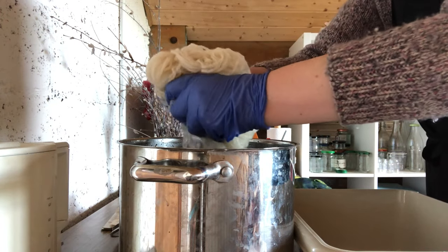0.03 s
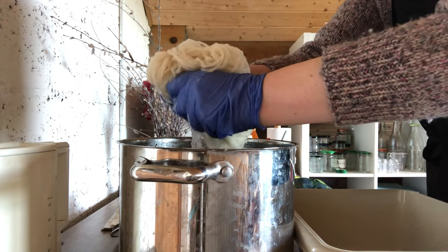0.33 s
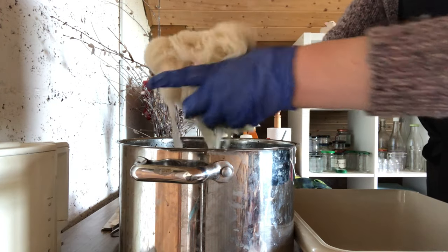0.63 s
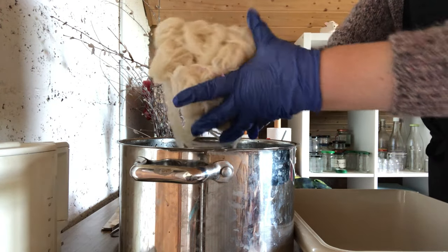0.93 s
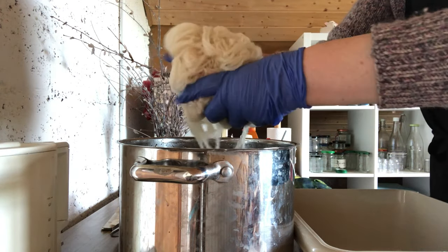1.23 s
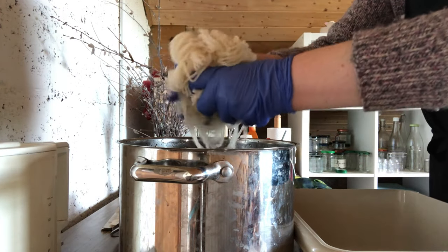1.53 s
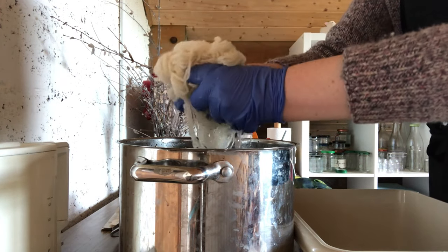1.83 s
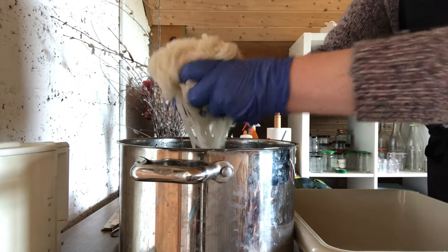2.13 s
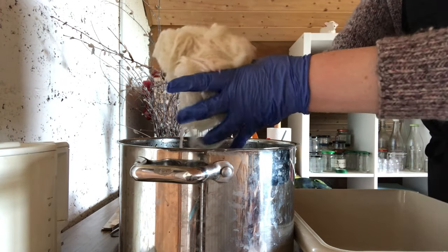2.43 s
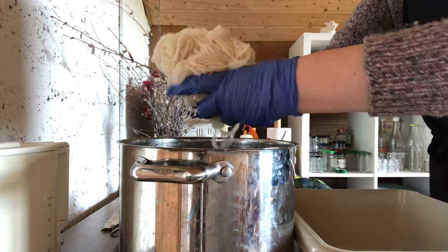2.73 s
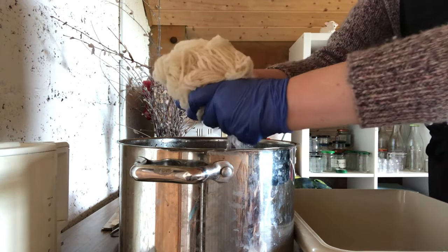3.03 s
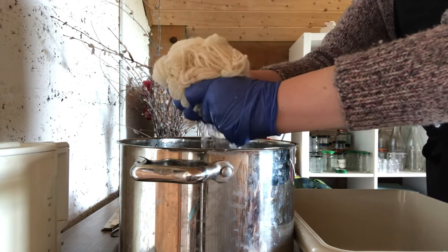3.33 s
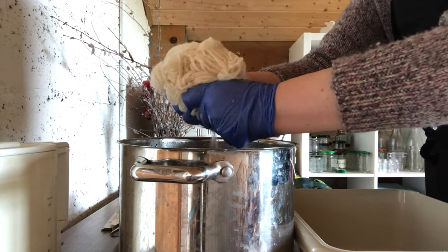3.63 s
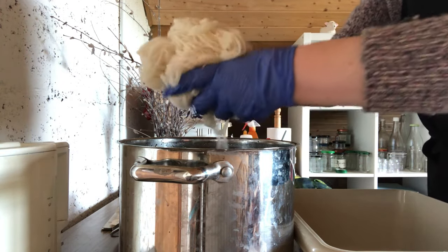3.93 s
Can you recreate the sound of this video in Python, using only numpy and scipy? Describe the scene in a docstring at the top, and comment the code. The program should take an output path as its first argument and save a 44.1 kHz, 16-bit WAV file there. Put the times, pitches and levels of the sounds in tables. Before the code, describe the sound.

Close up in a quiet room, water squeezed from wet wool gushes briefly into a metal pot, then trickles and plinks in two more spurts. Rubber gloves rub and crackle softly over a faint hum.

```python
"""Gloved hands wring wet wool over a steel pot of water, in a quiet room with a faint hum.
The first squeeze fizzes and sends down a gurgling gush; drops tick on the water and trap bubbles
that ring, and the air in the pot rings along. The gloves rub as they shift their grip, and a loud
drop lands at 1.4 s. A second squeeze fizzes and trickles near 2 s, then the gloves rub again.
From 3 s a last squeeze drips, spits and crackles, and fades away by 4 s."""
import sys
import numpy as np
from scipy import signal
from scipy.fft import rfft, irfft
from scipy.io import wavfile

SR = 44100
rng = np.random.default_rng(int(sys.argv[2]) if len(sys.argv) > 2 else 0)


def bounce(signal):
    """Save signal as a 16-bit WAV file at the path given by the first command-line argument."""
    frames = np.transpose(np.atleast_2d(signal))
    limited = np.clip(frames, -1, 1)
    pcm = np.round(limited * 32767).astype(np.int16)
    wavfile.write(sys.argv[1], SR, pcm)


N = 176400
TIME = np.arange(N) / SR


def from_db(db):
    """Turn decibels into a number to multiply a sound by."""
    return 10 ** (np.asarray(db) / 20)


def rms_one(x):
    """Scale a sound so that its average strength (rms) is 1."""
    return x / np.sqrt(np.mean(x ** 2) + 1e-20)


def level(curve):
    """Join (time_s, level_db) points into a gain that changes over time."""
    return from_db(np.interp(TIME, *np.transpose(curve)))


def at_hz(points, hz):
    """Read the gain at one pitch from (pitch_hz, level_db) points."""
    pitches, db = np.transpose(points)
    return from_db(np.interp(np.log(hz + 1e-9), np.log(pitches), db))


def colour(x, spectrum):
    """Shape the lows and highs of a steady sound; the result has strength 1."""
    hz = np.arange(N // 2 + 1) * SR / N
    return rms_one(irfft(rfft(x) * at_hz(spectrum, hz) * (hz > 20), N))


def band(x, edges_hz):
    """Keep the part of a sound between a low and a high pitch."""
    capped_hz = np.minimum(edges_hz, [8000, 16000])
    return signal.sosfilt(signal.butter(2, capped_hz, "band", fs=SR, output="sos"), x)


def decay(t, fade_s):
    """Die away by 60 dB in fade_s seconds; every fade_s below means this."""
    return np.exp(-np.log(1000) * t / fade_s)


def ring(x, hz, fade_s):
    """Each click in x starts a pure tone that dies away."""
    shrink = from_db(-60 / (fade_s * SR))
    turn = 2 * np.pi * hz / SR
    return signal.lfilter([0, np.sin(turn)], [1, -2 * shrink * np.cos(turn), shrink ** 2], x + 1e-18)


def grains(per_s, spread_db):
    """Random clicks, most small and a few large."""
    sizes = from_db(spread_db * np.minimum(rng.exponential(1, N), 4))
    return sizes * rng.choice([-1, 1], N) * (rng.random(N) < per_s / SR)


def room_tone():
    """Steady background noise and a low, wavering hum that swells and fades."""
    # lows and highs of the noise: pitch_hz, level_db
    noise_spectrum = [(25, -22), (60, -5.5), (100, -7.5), (180, -4.5), (380, -5.5), (620, -7.5), (960, -13),
                      (1790, -19.5), (2800, -21), (4800, -20), (7700, -25.5), (8600, -27.5), (16000, -31)]
    # the two tones of the hum: pitch_hz, level_db
    hum_tones = [(35.4, -72), (70.8, -67.5)]
    # rise and fall of the hum: time_s, level_db
    hum_swell = [(0, -5), (.6, -0.5), (2, 6), (2.8, -0.5), (4, -2.5)]
    waver_times = np.linspace(0, TIME[-1], 16)
    hum = 0
    for hz, db in hum_tones:
        tone = np.sqrt(2) * np.sin(2 * np.pi * (hz * TIME + rng.random()))
        waver = np.interp(TIME, waver_times, rng.standard_normal(len(waver_times)))
        hum += from_db(db) * tone * (1 + 0.41 * waver)
    return level(hum_swell) * hum + from_db(-55) * colour(rng.standard_normal(N), noise_spectrum)


def echoes(x, delay_s, fade_s):
    """Dense echoes start after a delay and die away, a little duller than the source."""
    t = TIME[:SR // 2]
    tail = rng.standard_normal(len(t)) * decay(t, fade_s) * (t > delay_s)
    echoed = signal.fftconvolve(x, tail / np.linalg.norm(tail))[:N]
    return signal.sosfilt(signal.butter(1, 9000, fs=SR, output="sos"), echoed)


def pot(x):
    """The air in the pot picks up a sound and rings on at its own pitches."""
    # notes of the air in the pot: pitch_hz, level_db, fade_s
    air_notes = [(673, 3, 0.15), (1203, 0, 0.41), (1394, -11, 0.27), (2392, 2.5, 0.025),
                 (2600, -2.5, 0.062), (2907, 1, 0.16), (3950, -15, 0.18), (6700, 1.5, 0.051)]
    out = 0
    for hz, db, fade_s in air_notes:
        width_hz = np.log(1000) / (np.pi * fade_s)
        out += from_db(db) * signal.lfilter(*signal.iirpeak(hz, hz / width_hz, fs=SR), x)
    return out


def glove_rubs():
    """Rubber slides softly over the wool as the hands shift their grip."""
    # strokes of the gloves: peak_s, half_length_s, level_db
    rubs = [(0.427, 0.076, -50), (0.733, 0.052, -62.5), (1.034, 0.03, -59.5), (1.362, 0.0053, -51),
            (1.697, 0.045, -55.5), (2.312, 0.063, -58.5), (2.671, 0.025, -49), (2.823, 0.029, -56.5),
            (3.688, 0.06, -55.5)]
    # lows and highs of the rubbing: pitch_hz, level_db
    rub_spectrum = [(800, -10), (2300, -5.5), (3300, 4), (4200, -1), (7500, -7), (9000, -14), (15500, -16)]
    strokes = sum(from_db(db) * np.exp(-.5 * ((TIME - peak_s) / half_s) ** 2)
                  for peak_s, half_s, db in rubs)
    return strokes * colour(rng.standard_normal(N), rub_spectrum)


def glove_crackle():
    """Wet rubber crackles and snaps as it sticks and peels."""
    # strength of the fine crackle: time_s, level_db
    crackle_curve = [(0, -64), (.3, -65), (.55, -71), (1.3, -88), (1.58, -58), (1.8, -64.5), (2.12, -66),
                     (2.35, -77), (3.05, -69.5), (3.25, -51.5), (3.34, -68.5), (3.62, -62), (4, -84)]
    # the sharpest snaps: start_s, level_db
    snap_list = [(0.2728, -44), (0.342, -40), (0.405, -42), (0.8914, -44), (1.3943, -38), (1.541, -43.5),
                 (1.9405, -40), (2.159, -49), (3.188, -46), (3.242, -36), (3.384, -40.5), (3.524, -41)]
    # lows and highs of both: pitch_hz, level_db
    peel_spectrum = [(2000, -25), (5000, 5.5), (8000, 5.5), (12000, 6), (15500, 4)]
    clicks = grains(per_s=54, spread_db=4)
    crackle = signal.fftconvolve(clicks, decay(TIME[:SR // 10], fade_s=0.017))[:N]
    snaps = sum(from_db(db - 4.5) * (TIME >= start_s) * decay(np.abs(TIME - start_s), fade_s=0.034)
                for start_s, db in snap_list)
    peeling = level(crackle_curve) * rms_one(crackle) + snaps
    return peeling * colour(rng.standard_normal(N), peel_spectrum)


def wool_fizz():
    """Water is forced through the wool: tiny films crackle between the fibres, over a soft hiss."""
    # strength of the fizz: time_s, level_db
    squeeze_curve = [(0, -52.5), (.2, -57), (.29, -49), (.37, -70), (.415, -45), (.47, -57), (.56, -63),
                     (.85, -65.5), (1.3, -62), (1.37, -52), (1.44, -60), (1.8, -61.5), (2.03, -48.5),
                     (2.17, -56), (2.45, -79), (3.1, -62), (3.24, -55), (3.35, -60), (3.55, -60.5),
                     (3.64, -54.5), (3.8, -59.5), (4, -67)]
    # lows and highs of the fizz: pitch_hz, level_db
    fizz_spectrum = [(300, -11.5), (700, -2), (1500, -2), (3000, -2.5), (5000, -3), (7500, -4.5),
                     (9000, -8.5), (15500, -13)]
    crackle = rms_one(grains(per_s=2200, spread_db=4))
    hiss = from_db(-5) * rng.standard_normal(N)
    return level(squeeze_curve) * colour(crackle + hiss, fizz_spectrum)


def spits():
    """Trapped air breaks out of the wool in short, bright, wet bursts."""
    # bursts of air and water: start_s, pitch_hz, level_db, fade_s
    bursts = [(.2015, 6900, -43, 0.059), (.2285, 5300, -35.5, .035), (0.2931, 6840, -33.5, 0.022),
              (1.469, 4170, -39.5, 0.017), (1.861, 5800, -42.5, 0.035), (1.9, 6700, -41, 0.021),
              (1.943, 5040, -43, 0.045), (2.0, 6360, -47, 0.035), (2.026, 6700, -45, 0.035),
              (2.088, 5300, -40, 0.016), (2.967, 5000, -42, 0.011), (3.1632, 6840, -37.5, 0.012),
              (3.289, 4650, -44.5, .04), (3.4943, 5400, -39, .005), (3.6045, 3750, -23, 0.012)]
    width_octaves = 0.56
    t = TIME[:SR // 5]
    out = np.zeros(N + SR)
    for start_s, hz, db, fade_s in bursts:
        edges_hz = hz * 2 ** (width_octaves * np.array([-.5, .5]))
        spray = rms_one(band(rng.standard_normal(len(t)), edges_hz))
        start = int(start_s * SR)
        out[start:start + len(t)] += from_db(db) * decay(t, fade_s) * spray
    return out[:N]


def bubble_cloud(sizes, per_s, spread_db, ring_cycles, pitch_count=48):
    """Bubbles form at random and ring briefly, each at the pitch its size gives it."""
    births = grains(per_s, spread_db)
    pitch_choice = rng.integers(0, pitch_count, N)
    pitches = np.geomspace(sizes[0][0], sizes[-1][0], pitch_count)
    rings = sum(at_hz(sizes, hz) * ring(births * (pitch_choice == k), hz, ring_cycles / hz)
                for k, hz in enumerate(pitches))
    rumble_cut = signal.butter(2, pitches[0] * 2 / 3, "high", fs=SR, output="sos")
    return rms_one(signal.sosfilt(rumble_cut, rings))


def trickle():
    """Thin streams stir up many small bubbles; the first gush also gurgles with large ones."""
    # strength of the trickle: time_s, level_db
    trickle_curve = [(0, -45.5), (.13, -51.5), (.3, -49.5), (.4, -64), (.55, -64.5), (1.3, -79), (1.6, -60),
                     (1.8, -57.5), (1.92, -55), (2.04, -47), (2.17, -65.5), (2.4, -67.5), (3.08, -63),
                     (3.2, -50.5), (3.35, -52.5), (3.47, -49), (3.58, -59), (3.66, -58.5), (3.8, -69),
                     (4, -86)]
    # mix of small bubbles: pitch_hz, level_db
    small_sizes = [(920, -9), (1250, -0.5), (1750, -3.5), (2500, -0.5), (3300, -.5), (4500, 2),
                   (7600, -0.5)]
    # strength of the first gush: time_s, level_db
    gush_curve = [(0, -44), (.06, -52), (.12, -44.5), (.2, -69), (.29, -49.5), (.36, -66), (.44, -58),
                  (.6, -75), (.8, -84)]
    # mix of large bubbles: pitch_hz, level_db
    large_sizes = [(620, -1), (680, 11), (820, -30), (1200, 3), (2000, -12)]
    small = bubble_cloud(small_sizes, per_s=1100, spread_db=3.5, ring_cycles=44)
    large = bubble_cloud(large_sizes, per_s=640, spread_db=2, ring_cycles=16.5)
    return level(trickle_curve) * small + level(gush_curve) * large


def drops():
    """Each drop ticks on the water and traps a bubble that rings, rising slightly in pitch."""
    # drops and their bubbles: start_s, pitch_hz, bubble_level_db, bubble_fade_s, tick_level_db
    landings = [(.001, 673, -32, 0.028, -42), (0.02, 1100, -32.5, 0.046, -40),
                (0.0366, 1283, -23, 0.015, -37.5), (.037, 2170, -27.5, 0.0088, -38),
                (0.057, 3880, -36, 0.018, -50), (0.081, 1240, -34, 0.01, -49),
                (0.1041, 1945, -30.5, 0.044, -31.5), (0.105, 1130, -30, 0.023, -45),
                (0.1288, 3460, -33.5, 0.011, -58), (0.154, 1060, -40, 0.051, -39),
                (0.221, 2430, -39, 0.032, -52), (0.25, 2442, -39, 0.047, -53),
                (.2746, 636, -40, 0.029, -48), (0.2924, 6750, -31, 0.018, -43),
                (0.296, 1890, -30, 0.011, -43), (.3511, 675, -35, 0.023, -50),
                (.3512, 2670, -34, .015, -47), (0.892, 2090, -33, 0.019, -35.5),
                (1.395, 1232, -18.5, 0.019, -34), (1.3965, 1510, -30.5, 0.016, -46),
                (1.4054, 1200, -35.5, 0.17, -50), (1.4103, 1650, -35.5, 0.025, -50),
                (1.696, 1935, -33, 0.043, -45), (1.8262, 1344, -39.5, 0.055, -39.5),
                (1.86, 1190, -35, 0.03, -35.5), (1.8964, 1163, -33, 0.052, -52),
                (1.9245, 2300, -34.5, 0.016, -39), (1.9287, 1350, -27, 0.02, -47),
                (1.9324, 1088, -28.5, 0.037, -41), (1.9592, 2080, -26, 0.021, -37),
                (1.9885, 2018, -36, 0.043, -53), (1.9945, 955, -23.5, 0.017, -46),
                (2.0152, 1570, -35.5, 0.054, -56), (2.028, 2530, -35.5, 0.021, -46),
                (2.0676, 2330, -36.5, 0.025, -44), (3.0266, 1412, -23, 0.057, -36.5),
                (3.1417, 1760, -31.5, 0.0094, -47), (3.1503, 2590, -40.5, 0.032, -48),
                (3.1718, 1170, -44, 0.082, -58), (3.2062, 4200, -30, 0.013, -50),
                (3.2112, 1374, -24.5, 0.018, -33.5), (3.2624, 1140, -40.5, .032, -43),
                (3.284, 1460, -35.5, 0.039, -40.5), (3.3219, 1156, -31.5, 0.025, -56),
                (3.4227, 2206, -34.5, 0.058, -40.5), (3.441, 3490, -38, 0.035, -55),
                (3.4495, 1035, -30, 0.022, -45), (3.4772, 2640, -40, 0.03, -52),
                (3.5014, 1020, -28.5, 0.016, -57), (3.5138, 5750, -30, 0.0094, -53),
                (3.5644, 3310, -32, 0.017, -51), (3.629, 3200, -30, 0.016, -46),
                (3.633, 2600, -26, 0.0067, -44)]
    pitch_rise, swell_cycles = 0.039, 0.75   # the pitch climbs 3.9% while the bubble fades
    t = TIME[:SR // 5]
    out = np.zeros(N + SR)
    for start_s, hz, bubble_db, fade_s, tick_db in landings:
        cycles = hz * (t + pitch_rise * t * t / (2 * fade_s))
        swell = 1 - np.exp(-cycles / swell_cycles)
        bubble = from_db(bubble_db) * swell * decay(t, fade_s) * np.sin(2 * np.pi * cycles)
        impact = from_db(tick_db) * decay(t, fade_s=0.019) * rng.choice([-1, 1], len(t))
        tick = 2 * band(impact, [0.6 * hz, 2.85 * hz])   # larger, lower drops tick duller
        spray = from_db(-14) * impact
        start = int(start_s * SR)
        out[start:start + len(t)] += bubble + tick + spray
    return from_db(0.5) * out[:N]


def scene():
    """Water sounds inside the pot, the wool and gloves above it, all in the room."""
    water = drops() + trickle() + spits()
    pot_walls = from_db(-10) * echoes(water, delay_s=0.006, fade_s=0.032)
    near = water + pot(water) + pot_walls + wool_fizz() + glove_rubs() + glove_crackle()
    room = from_db(-12) * echoes(near, delay_s=0.0067, fade_s=0.27)
    return (near + room + room_tone())[None]


def record(dry):
    """The highest treble, above 16000 Hz, is cut steeply."""
    return signal.sosfilt(signal.ellip(10, .1, 80, 16000, fs=SR, output="sos"), dry)


dry = scene()
out = record(dry)
bounce(out)
```